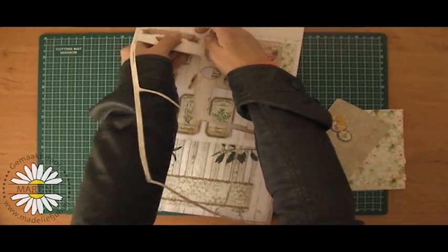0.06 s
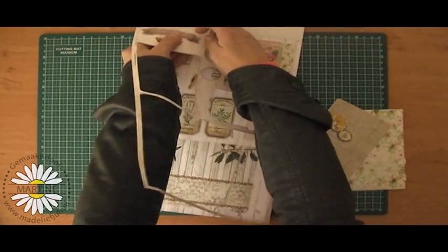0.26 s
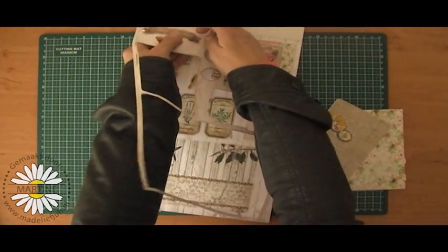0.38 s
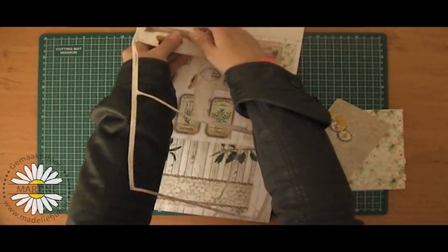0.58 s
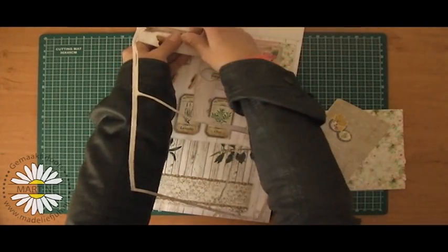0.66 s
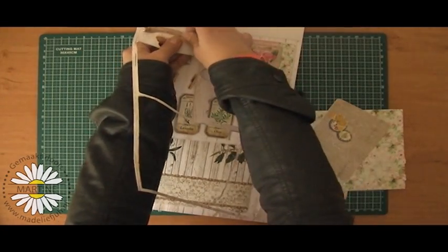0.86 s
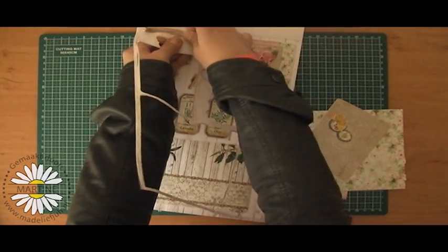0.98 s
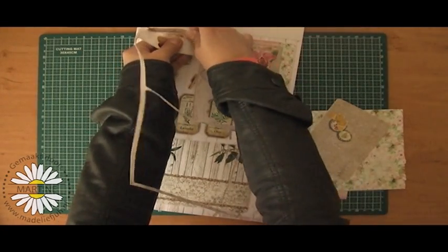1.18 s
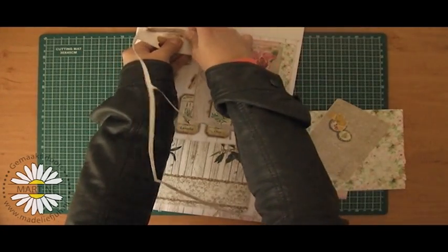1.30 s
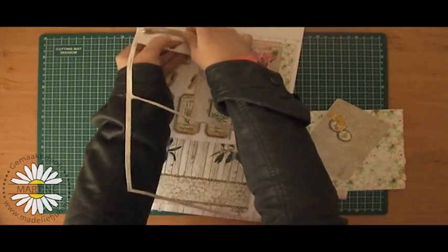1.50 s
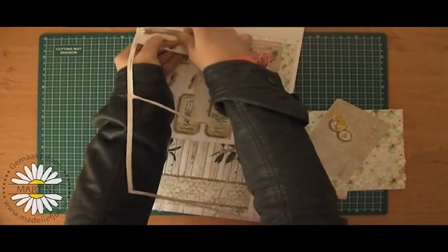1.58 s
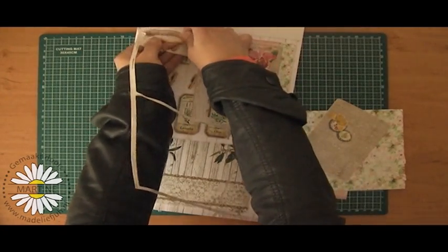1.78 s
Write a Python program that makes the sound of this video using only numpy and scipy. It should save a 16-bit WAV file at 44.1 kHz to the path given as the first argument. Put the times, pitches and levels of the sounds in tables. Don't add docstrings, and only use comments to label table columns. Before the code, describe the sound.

Stiff card tears along perforations in a quick, loud cluster of crackling snaps, then faint finger ticks, one clear snap midway and soft rubbing with small crackles; close microphone, small room, low hiss.

```python
import sys
import numpy as np
from scipy import signal
from scipy.fft import rfft, irfft, next_fast_len
from scipy.io import wavfile
from scipy.ndimage import map_coordinates

SR = 44100
rng = np.random.default_rng(int(sys.argv[2]) if len(sys.argv) > 2 else 0)


def bounce(signal):
    frames = np.transpose(np.atleast_2d(signal))
    limited = np.clip(frames, -1, 1)
    pcm = np.round(limited * 32767).astype(np.int16)
    wavfile.write(sys.argv[1], SR, pcm)


def to_linear_factor(level_db):
    exponent = np.asarray(level_db, float) / 20
    return 10 ** exponent


N = 81585


def unit(x):
    return x / np.sqrt(np.mean(x ** 2) + 1e-20)


def along(points, hz):
    point_hz, value = np.transpose(points)
    return np.interp(np.log(hz + 1), np.log(point_hz + 1), value)


def wobble(rate_hz):
    knots = rng.standard_normal(int(N * rate_hz / SR) + 4)
    return map_coordinates(knots, [np.arange(N) * rate_hz / SR])


def filtered(x, response):
    n = x.shape[-1]
    size = next_fast_len(n + 8192)
    spectrum = rfft(x, size) * response(np.fft.rfftfreq(size, 1 / SR))
    return irfft(spectrum, size)[..., :n]


def resonance(f, centre_hz, width_hz):
    damping = 1j * f * width_hz
    return damping / (centre_hz ** 2 - f ** 2 + damping)


def modes(group):
    return lambda f: sum((-1) ** k * to_linear_factor(level_db) * resonance(f, centre_hz, width_hz) ** 2
                         for k, (centre_hz, width_hz, level_db) in enumerate(group))


def noise_band(shape, centre_hz, width_hz):
    return unit(filtered(rng.standard_normal(shape), modes([(centre_hz, width_hz, 0)])))


def add_at(out, start_s, sound):
    start = round(start_s * SR)
    out[:, start:start + sound.shape[-1]] += sound


def arch(start_s, length_s):
    t = np.arange(N) / SR
    return np.sin(np.pi * np.clip((t - start_s) / length_s, 0, 1))


def stereo(pair, alike):
    def spread(hz):
        angle = np.arccos(np.clip(along(alike, hz), -1, 1)) / 2
        return np.array([np.cos(angle), 1j * np.sin(angle)])
    mid, side = filtered(pair, spread)
    return np.array([mid + side, mid - side])


# hz, likeness
CARD_ALIKE = [(100, 0.5), (600, .99), (1500, 1), (3100, 0.94), (6800, 0.82), (9000, 0.068), (15000, 0.21)]


def card_stereo(pair):
    return stereo(pair, CARD_ALIKE)


# hz, t60_s
ROOM_DECAY = [(300, 0.26), (2000, 0.22), (5500, 0.23), (14000, 0.26)]


def room():
    size, start_s = SR // 2, 0.00077
    hz, t, z = signal.stft(rng.standard_normal((2, size)), SR, nperseg=128)
    decay = to_linear_factor(-60 * t / along(ROOM_DECAY, hz)[:, None])
    tail = signal.istft(z * decay, SR, nperseg=128)[1][:, :size]
    tail = tail * np.clip(np.arange(size) / SR / start_s - 1, 0, 1)
    return tail / np.linalg.norm(tail[0])


# centre_hz, width_hz, level_db
FLEX = [(430, 510, -12), (600, 400, -5.5), (980, 606, 1.5), (1273, 2200, -5), (1886, 1100, 2.5)]
RING = [(2720, 760, 4.5), (3330, 2360, 4)]
UPPER = [(5160, 1220, 1.94), (6270, 1050, -1.96)]
FIZZ = [(8000, 2350, 0.5), (9380, 670, 4.5), (9650, 1950, -2), (13500, 5900, -25.5)]
GROUP_DB = [4.5, -4, 2, 10.5]
TEAR_T60_S = [
    [.0028],
    [.003],
    [.0045],
    [.009],
]
# start_s, ring_peak_db, then flex_db, upper_db, fizz_db over
TEARS = [
    (0.2559, -6, -6.5, -6.5, -19),
    (0.3167, -7.5, -5, 2.5, -17.5),
    (0.3367, -3.5, -16, -8.5, -23.5),
    (0.3432, -7.5, -13, -31.5, -21),
    (0.4178, -7.5, -7.5, -16, -20),
    (0.9483, -27.5, -16.5, -20.5, -13),
         (0.1981, -30.5, -14.5, -8, -18.5),
    (0.2283, -15.5, -3, -9.5, -12),
    (0.2297, -4, -25, -33, -23.5),
    (0.2348, -29.5, -5, -20, -17),
    (0.2506, -23.5, -29.5, -45, -8),
    (0.3818, -10.5, -15.5, -13.5, -28),
    (1.4772, -50.5, -15, -13, 5),
         (0.7101, -26, -13, 1, -8),
    (1.4818, -43, 6.5, 7, 1.5),
    (1.4847, -32, -1.5, -18, -14),
    (1.6505, -50, -17, -10.5, -3.5),
         (1.0831, -14.5, -9, -9.5, -13.5),
         (1.0808, -26, -10, -8, -12),
    (1.109, -37, -20, -12, -2),
    (.1525, -46, -16, -3, -14),
    (1.0505, -45, -20, -14, -20),
    (1.0893, -22, -30, -9, -20),
]
TICKS = [(0.1148, -42.5, -3.5, 1.5, -9.5), (0.161, -40, -6.5, -8, -17), (0.1798, -41, -6, -13, -22),
         (0.537, -46, -5, -1.5, -5.5), (0.566, -33.5, -15.5, -4.5, -16), (0.795, -41, -14.5, -28, -25),
         (1.056, -51, -13, 3, -1), (1.1656, -32, -11, -32, -42), (1.2176, -40, -12, -44, -26.5),
         (1.259, -50.5, -5, -21, -4), (1.3571, -38.5, -10.5, -13, -13.5), (1.5755, -53, -18, -14, -5),
         (1.63, -45.5, -36.5, -4, -9), (1.76, -54.5, -3, -7, -11)]
# delay_s, level_db
ECHOES = [(.0064, -5), (.0118, -10), (.017, -15)]
# hz, level_db
ECHO_COLOUR = [(400, -12), (2500, -2), (3500, 0), (6500, 0), (10000, -8), (15000, -18)]


def snaps():
    tear_rise_s, room_db, flex_low_hz = 0.00078, 0.5, 360
    out, t = np.zeros((2, N + SR)), np.arange(768) / SR
    groups = [modes(g) for g in (FLEX, RING, UPPER, FIZZ)]
    impulses = [filtered(1. * (t == 0), g) for g in groups]
    tear = to_linear_factor(-60 * t / np.array(TEAR_T60_S)) * (1 - np.exp(-t / tear_rise_s)) ** 2
    events = [*TEARS, *TICKS]
    for start_s, peak_db, flex_db, upper_db, fizz_db in events:
        bursts = rng.standard_normal((4, len(t))) * tear
        rings = [filtered(b, g) for b, g in zip(bursts, groups)]
        gains = to_linear_factor(peak_db + np.add(GROUP_DB, [flex_db, 0, upper_db, fizz_db]))
        blow = sum(gain * r / np.abs(r).max() for gain, r in zip(gains, rings))
        colour = sum(gain * p / np.abs(p).max() for gain, p in zip(gains, impulses))
        add_at(out, start_s, to_linear_factor(room_db) * signal.fftconvolve(colour[None], room(), axes=1))
        add_at(out, start_s, blow)
        for delay_s, loss_db in ECHOES:
            echo = filtered(blow, lambda hz: to_linear_factor(loss_db + along(ECHO_COLOUR, hz)))
            add_at(out, start_s + delay_s, echo)
    return card_stereo(filtered(out[:, :N], lambda f: (1j * f / (flex_low_hz + 1j * f)) ** 2))


# start_s, level_db, pitch_hz, t60_s
FLAPS_AND_FIBRES = [(.2285, -25.5, 863, .1), (.256, -17, 863, 0.075), (.257, -30.5, 577, 0.18),
                    (0.2552, -13, 1847, .03), (.3172, -3, 5100, .012), (.318, -20, 856, 0.11),
                    (0.319, -15.5, 1163, 0.052), (.337, -21, 723, 0.048), (.4185, -23.5, 738, 0.068),
                    (1.083, -34, 1990, .06), (1.084, -31, 865.3, 0.13), (1.092, -32.5, 1546, 0.14),
                    (1.112, -34, 1165, 0.089), (1.11, -39, 431, 0.088), (1.484, -33.5, 696, 0.05),
                    (1.484, -40, 1770, .1), (1.486, -48, 406, 0.17), (1.506, -52.5, 1167, 0.11),
                    (.2282, -15, 8000, .008), (.2562, -12, 5000, .008), (.3368, -6, 3200, .014),
         (.3365, -14, 5000, .008), (.3812, -15, 2100, .012), (.4186, -14, 1950, .014),
         (.4183, -9, 3300, .011), (.4185, -15, 4500, .009), (.4205, -25, 9500, .01),
         (.2362, -16, 3300, .025), (.9484, -31, 3400, .015), (.426, -25, 1900, .12),
         (1.083, -15, 3100, .01), (1.0832, -17, 6000, .008), (1.0862, -23, 5200, .008),
         (1.0892, -17, 3350, .014), (1.0893, -18, 6200, .012), (1.0945, -25, 5900, .012),
         (1.4822, -30, 7800, .01), (1.485, -25, 2200, .008), (1.4885, -33, 9000, .012),
         (1.505, -36, 8500, .012), (1.63, -46, 4800, .008), (1.49, -47, 1180, .25)]
SHIVERS = [(.235, -16.5, 7200, 0.034), (0.235, -20.5, 3450, 0.022), (.318, -38, 12500, 0.21),
           (1.0825, -28, 5800, 0.2), (1.084, -36, 9600, 0.21), (1.083, -50, 13000, 0.24),
           (1.083, -49.5, 15000, 0.24), (0.439, -41, 5230, 0.2), (1.109, -38.5, 11000, .1),
           (1.4822, -34, 8800, 0.12), (1.631, -56, 5100, 0.019)]


def flaps():
    rise_cycles, shiver_width = 1.76, .26
    out, t = np.zeros((2, N + SR)), np.arange(SR // 4) / SR
    for start_s, level_db, pitch_hz, t60_s in FLAPS_AND_FIBRES:
        envelope = to_linear_factor(level_db - 60 * t / t60_s) * (1 - np.exp(-t * pitch_hz / rise_cycles))
        add_at(out, start_s, envelope * np.sin(2 * np.pi * pitch_hz * t))
    for start_s, level_db, pitch_hz, t60_s in SHIVERS:
        envelope = to_linear_factor(level_db - 60 * t / t60_s) * np.clip(t / .001, 0, 1)
        add_at(out, start_s, envelope * noise_band((2, len(t)), pitch_hz, shiver_width * pitch_hz))
    return card_stereo(out[:, :N])


# time_s, strength_db
RUB = [(0, -47), (0.059, -49.5), (.1, -57), (.2, -65), (.5, -79), (.65, -64), (.7, -55), (.76, -59.5),
       (1.0, -67.5), (1.3, -73.5), (1.371, -65.5), (1.395, -55.5), (1.452, -58), (1.48, -46.5),
       (1.52, -55.5), (1.658, -62), (1.72, -68.5), (1.85, -70.5)]
# hz, density_db
RUB_TONE = [(180, -38), (300, -15), (877, -7), (1260, -14.5), (1440, -8), (1870, -6), (3690, -3),
            (8420, -9), (15500, -21.5)]


def rustle():
    rub_db, grains_per_s, grain_db = 3, 2500, -7
    boom_db, boom_t60_s = -45.5, 0.25
    time_s, strength_db = np.transpose(RUB)
    t = np.arange(N) / SR
    struck = rng.random(N) < grains_per_s / SR * to_linear_factor(4 * wobble(30))
    grains = struck * rng.standard_normal(N)
    grains = grains + signal.fftconvolve(grains[None], room()[:, :4000], axes=1)[:, :N]
    skin = rng.standard_normal((2, N)) + to_linear_factor(grain_db) * unit(grains)
    rub = unit(card_stereo(filtered(skin, lambda hz: to_linear_factor(along(RUB_TONE, hz)))))
    rub = rub * to_linear_factor(np.interp(t, time_s, strength_db) + rub_db + 0.42 * wobble(24))
    boom = unit(card_stereo(filtered(rng.standard_normal((2, N)), modes(FLEX[1:3]))))
    return rub + to_linear_factor(boom_db - 60 * t / boom_t60_s) * boom


# start_s, length_s, level_db, pitch_hz
SQUEAKS = [
    (1.382, .065, -53, 3350),
    (1.555, .045, -61, 3400),
    (.246, .011, -30, 3500),
    (1.45, .035, -55, 8300),
    (1.5, .04, -53, 8700),
    (1.385, .07, -57, 7200),
    (.6, .11, -63, 3200),
    (.675, .035, -56, 6000),
]


def squeaks():
    width = 0.24
    return sum(to_linear_factor(level_db) * arch(start_s, length_s) ** .5 * noise_band(N, pitch_hz, width * pitch_hz)
               for start_s, length_s, level_db, pitch_hz in SQUEAKS)


# start_s, level_db, pitch_hz, length_s
THUDS = [(.248, -40, 159, 0.022), (.262, -46, 223, 0.034), (.312, -40, 172, 0.013),
         (.336, -37.5, 185, 0.017), (.415, -51.5, 111, 0.033), (0.585, -60, 60, 0.043),
         (1.082, -49.5, 119, 0.033), (1.11, -51.5, 116, 0.048), (1.105, -44, 214, 0.022),
         (1.168, -54, 50.4, 0.023), (1.485, -52, 180, 0.032),
         (.108, -55, 500, .016),
    (1.628, -57, 520, .02),
    (.29, -54, 45, .05),
]


def thuds():
    t = np.arange(N) / SR
    return sum(to_linear_factor(level_db) * np.sin(2 * np.pi * pitch_hz * (t - start_s)) * arch(start_s, length_s) ** 2
               for start_s, level_db, pitch_hz, length_s in THUDS)


# centre_hz, width_hz, gain
TABLE_MODES = [(588, 46, 0.2), (696, 16, 1.36), (848.6, 45, 0.64), (1109, 68, 0.56), (1512, 27, 1),
               (1970, 73, 0.08), (2883, 31, 0.24), (3188, 37, 0.49), (3405, 43, 0.47), (5540, 27, 0.32)]


def table(x):
    return filtered(x, lambda f: 1 + sum(gain * resonance(f, centre_hz, width_hz)
                                         for centre_hz, width_hz, gain in TABLE_MODES))


# hz, density_db
HISS = [(15, -31), (25, -8), (184, -1), (555, -9), (746, -10.5), (1630, -11), (2190, -13.5), (4920, -17.5),
        (15700, -26.5)]
# hz, likeness
HISS_ALIKE = [(40, 0.93), (130, 1), (300, 0.77), (1400, 0.66), (3800, 0.23), (15000, .1)]
# pitch_hz, rms_db
HUM = [(77, -68), (154, -67)]


def floor():
    hiss_db, rumble_db, rumble_hz = -60.5, -82.5, 90.2
    t = np.arange(N) / SR
    hiss = filtered(rng.standard_normal((2, N)), lambda hz: to_linear_factor(along(HISS, hz)))
    hiss = to_linear_factor(hiss_db) * unit(stereo(hiss, HISS_ALIKE))
    hum = 0
    for pitch_hz, rms_db in HUM:
        level = np.sqrt(2) * to_linear_factor(rms_db + 1.8 * wobble(6.8))
        hum = hum + level * np.sin(2 * np.pi * pitch_hz * t + .4 * wobble(6.1))
    rumble = to_linear_factor(rumble_db + 9.3 * wobble(7.06)) * noise_band((2, N), rumble_hz, 120)
    return hiss + hum + rumble


def scene():
    left_db = -0.23
    mix = table(snaps() + rustle()) + thuds() + squeaks() + floor() + flaps()
    return mix * to_linear_factor([[left_db], [-left_db]])


def top_cut(x):
    return signal.sosfilt(signal.butter(12, 15830, fs=SR, output="sos"), x)


# start_s, end_s, above_hz
DROPOUTS = [
    (.191, .195, 12500),
    (.216, .219, 0),
    (.2135, .222, 6000),
    (.301, .313, 10300),
    (.296, .316, 12500),
    (.411, .414, 8500),
    (.695, .703, 12500),
    (1.069, 1.077, 0),
]


def record(dry):
    top_hz, notch_hz, notch_width_hz, notch_db, fade_s = 15850, 1005, 50, -9, .004
    t = np.arange(N) / SR

    def band(hz):
        notch = np.exp(-((hz - notch_hz) / notch_width_hz) ** 2)
        return (hz < top_hz) * to_linear_factor(notch_db * notch)
    x = filtered(dry, band)
    for start_s, end_s, above_hz in DROPOUTS:
        hole = np.clip(np.minimum(t - start_s, end_s - t) / fade_s + 1, 0, 1)
        x = x - hole * filtered(x, lambda hz: np.clip((hz - above_hz) / 600 + 1, 0, 1))
    return top_cut(np.clip(x, -1, 1))


dry = scene()
out = record(dry)
bounce(out)
```